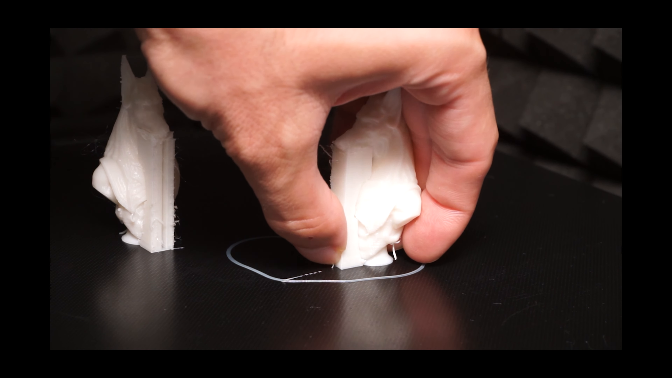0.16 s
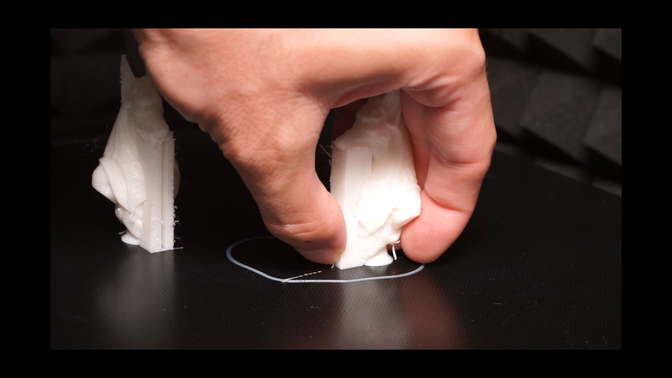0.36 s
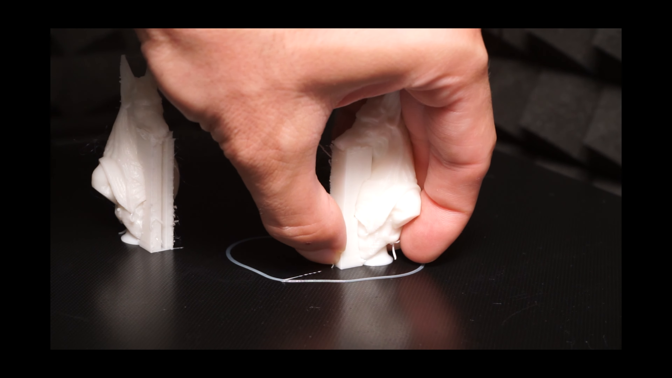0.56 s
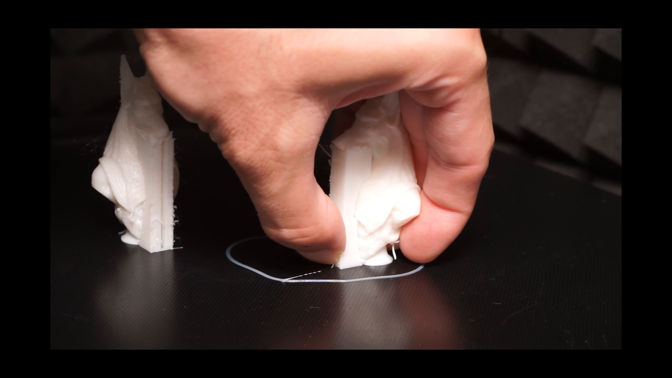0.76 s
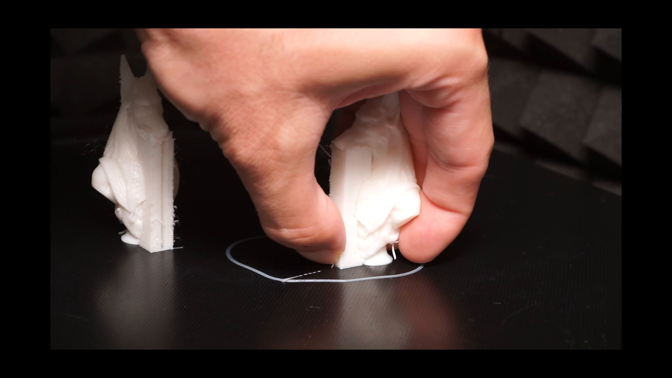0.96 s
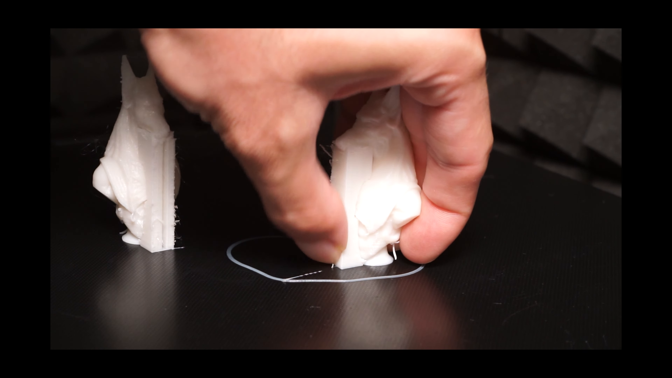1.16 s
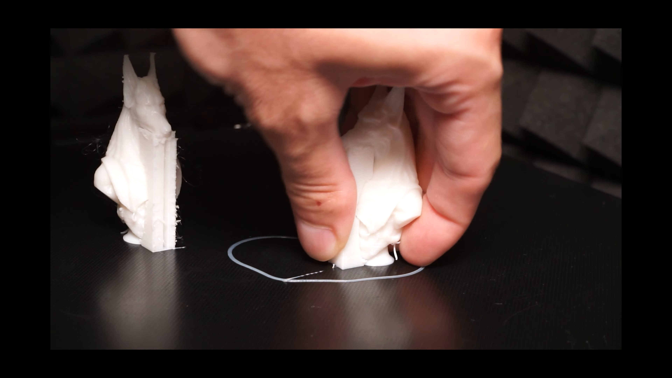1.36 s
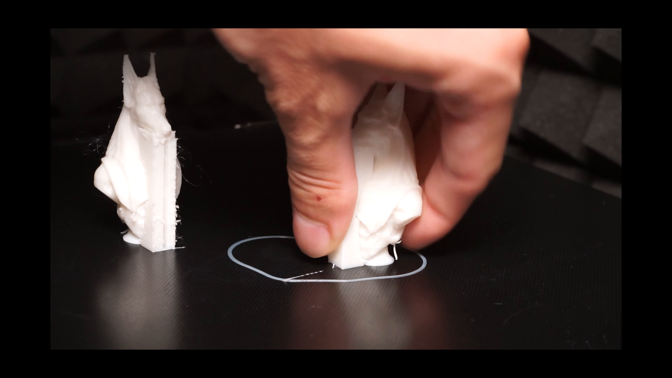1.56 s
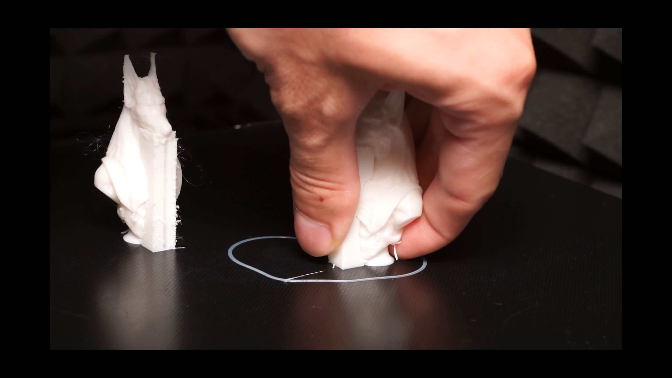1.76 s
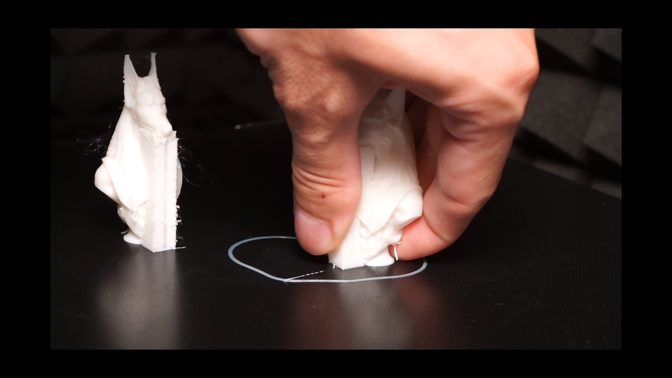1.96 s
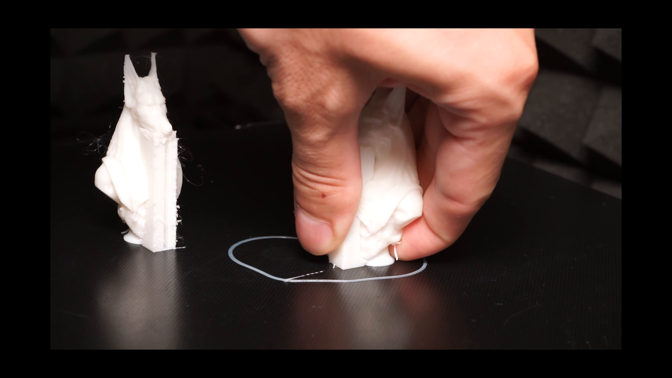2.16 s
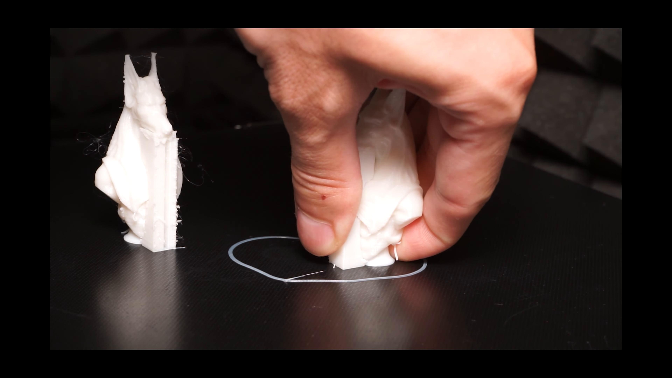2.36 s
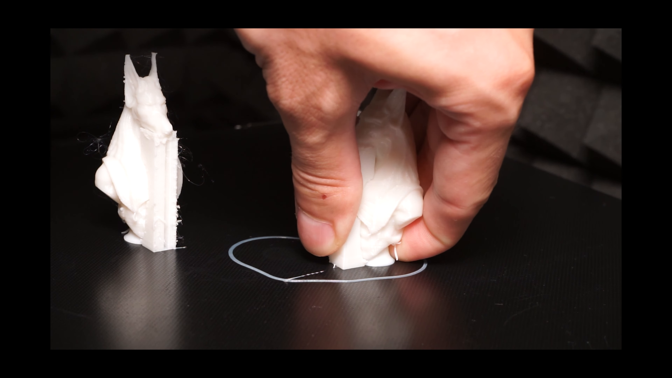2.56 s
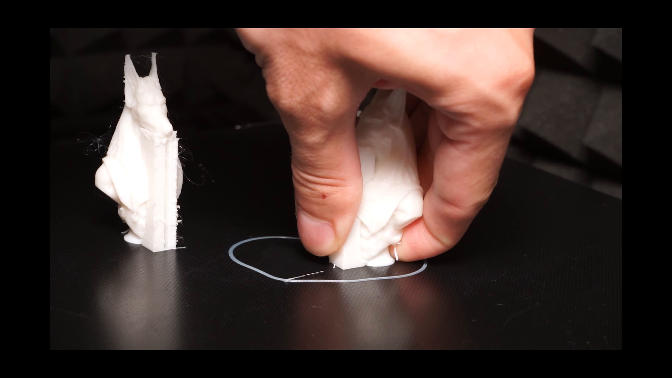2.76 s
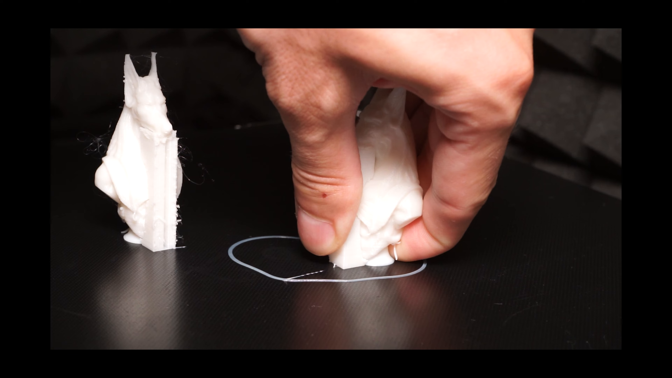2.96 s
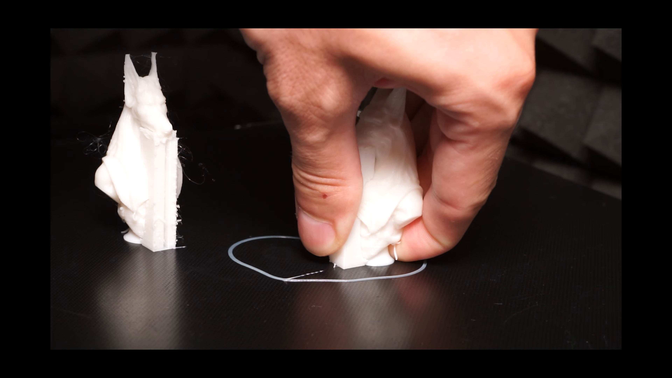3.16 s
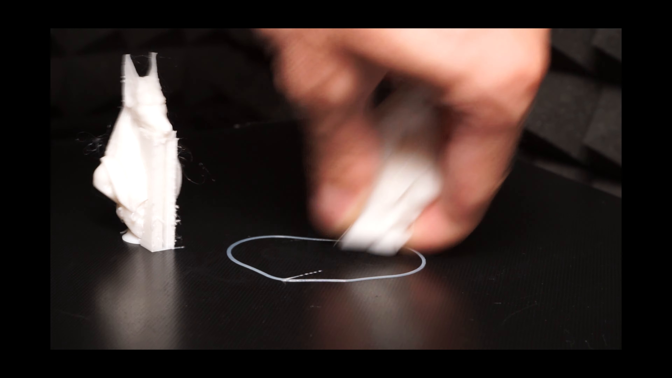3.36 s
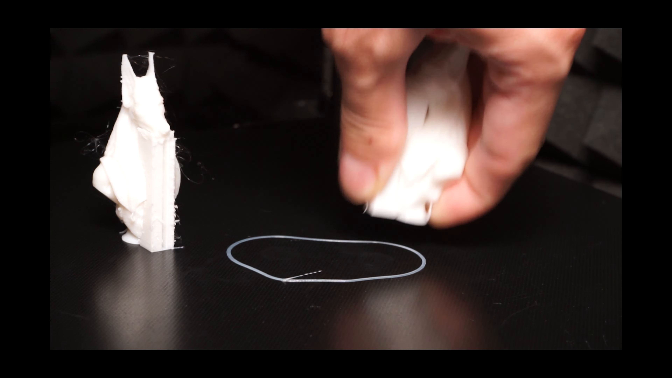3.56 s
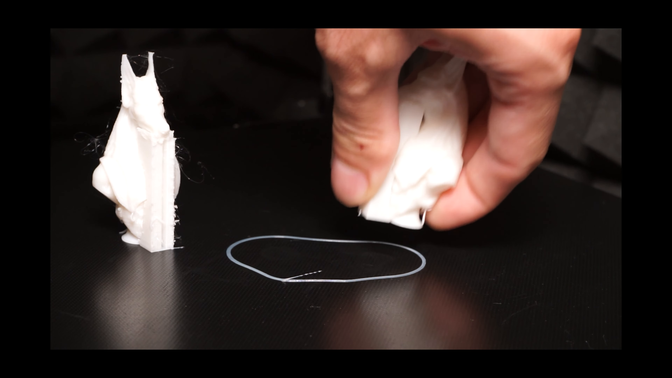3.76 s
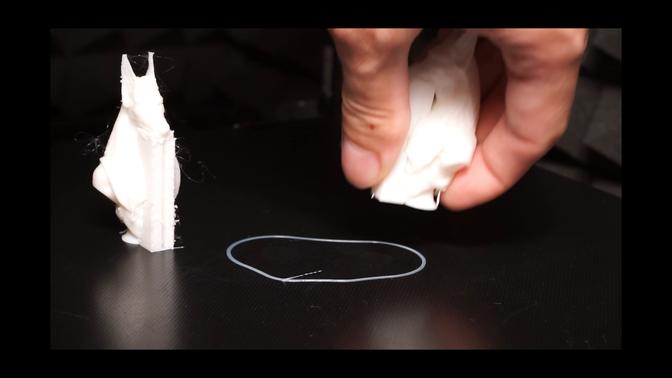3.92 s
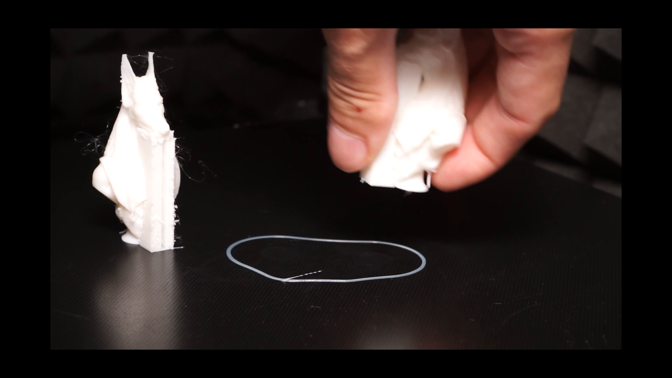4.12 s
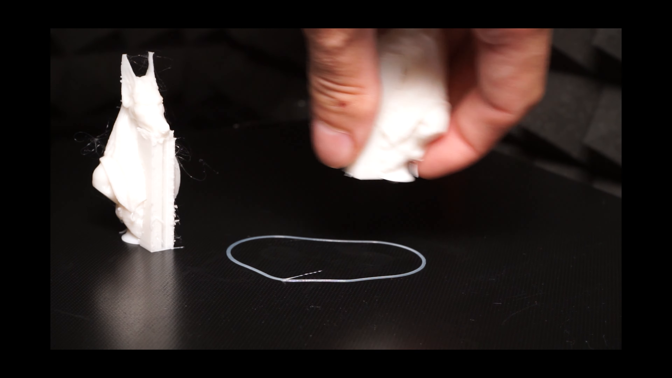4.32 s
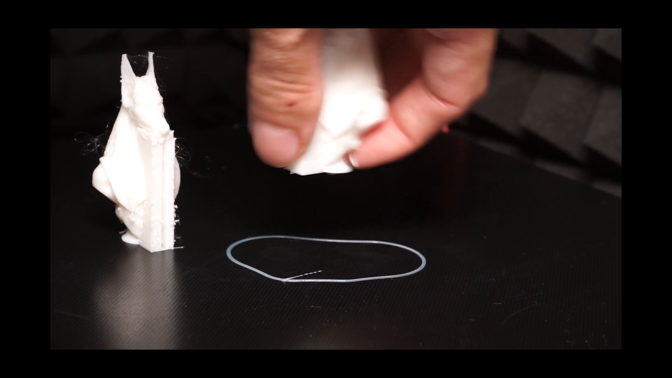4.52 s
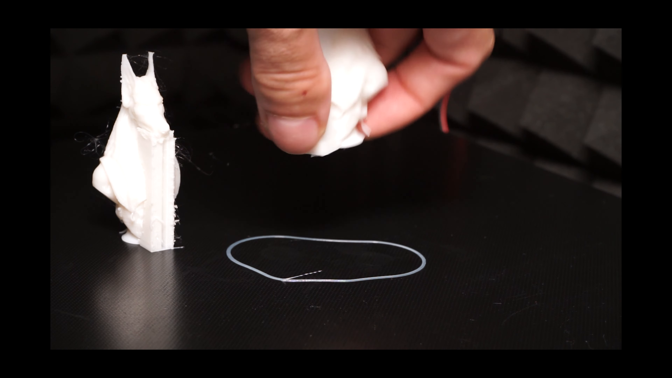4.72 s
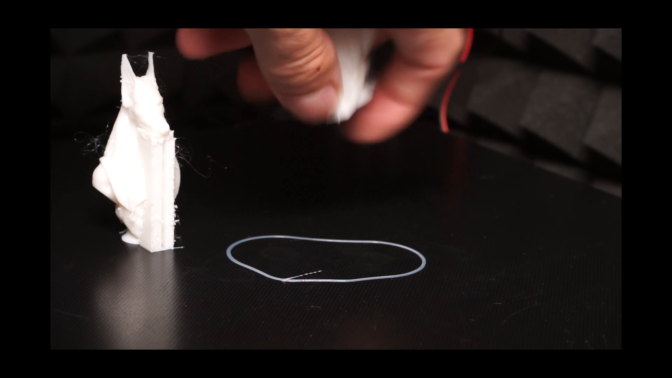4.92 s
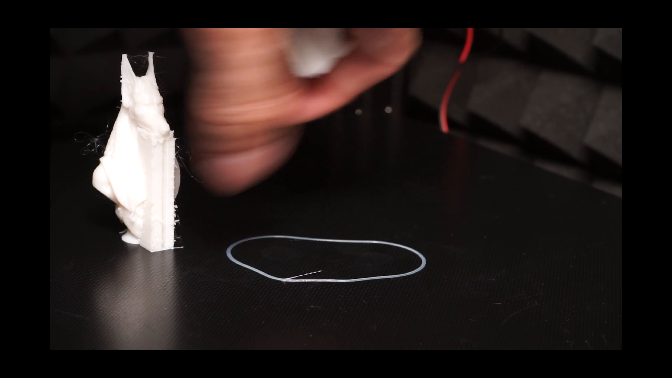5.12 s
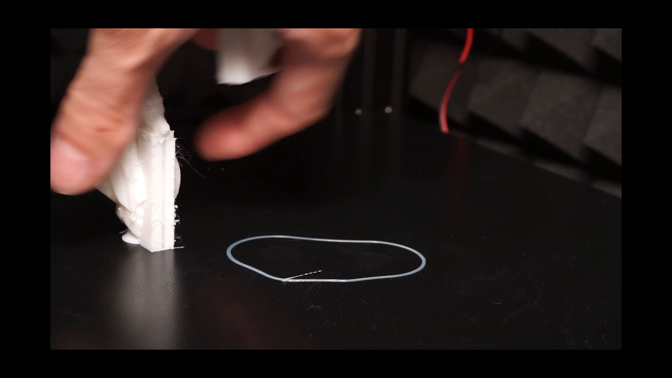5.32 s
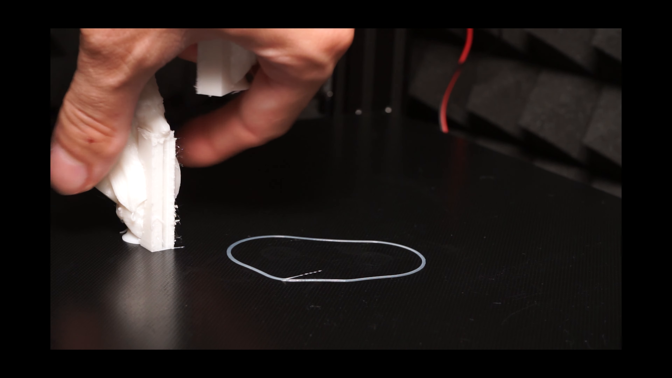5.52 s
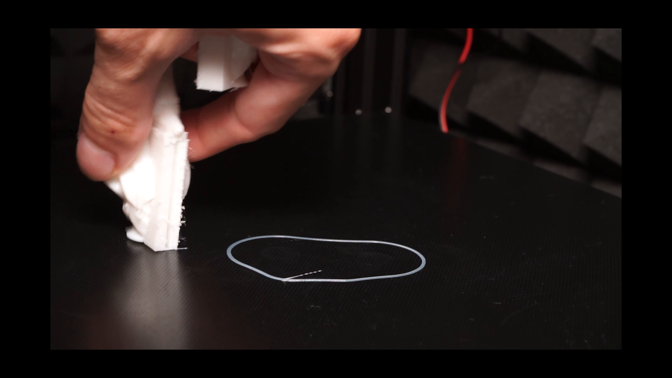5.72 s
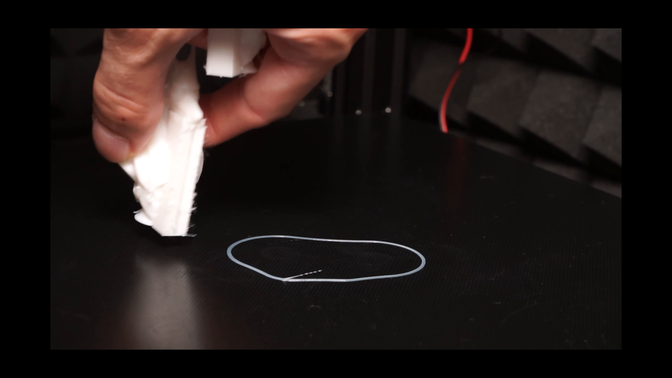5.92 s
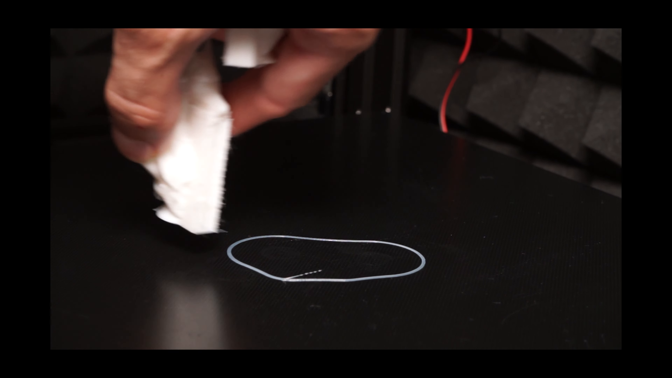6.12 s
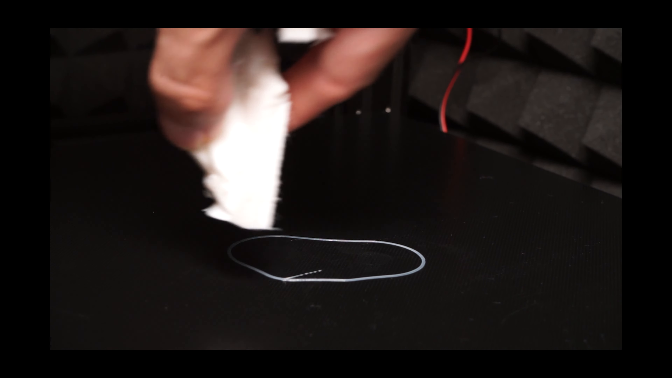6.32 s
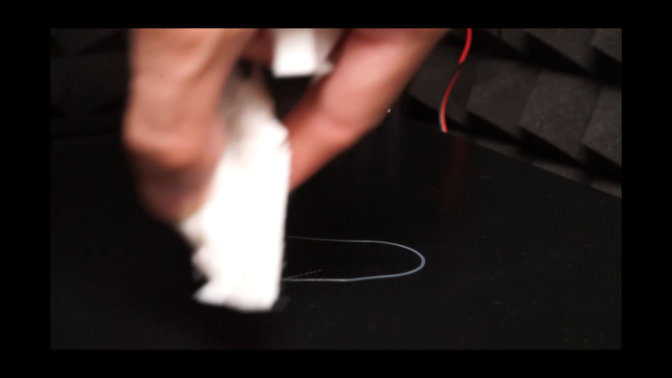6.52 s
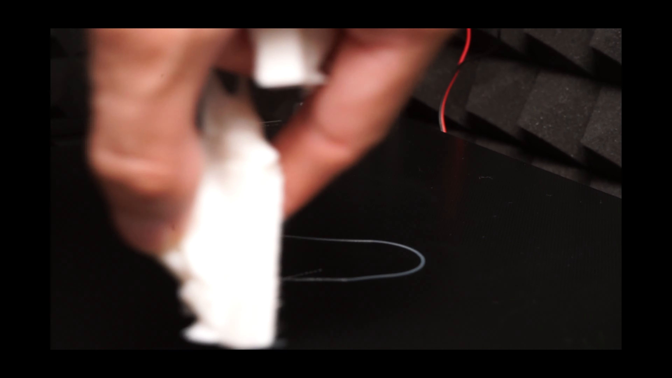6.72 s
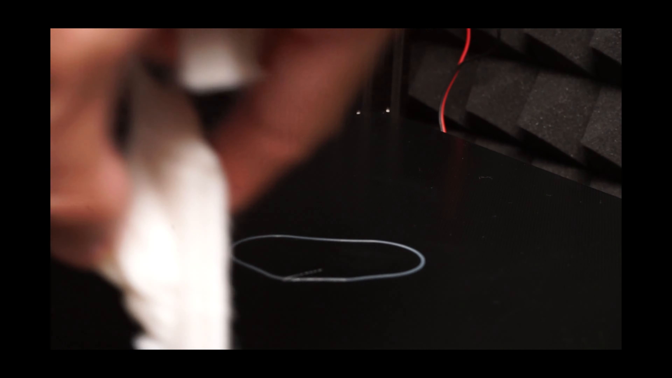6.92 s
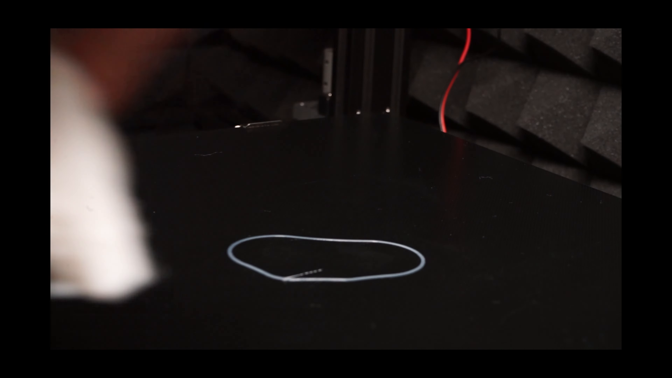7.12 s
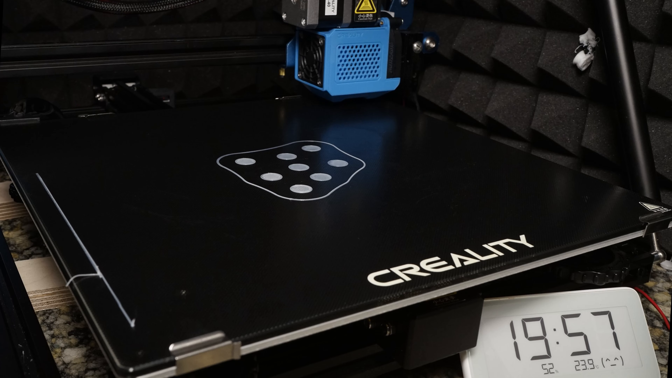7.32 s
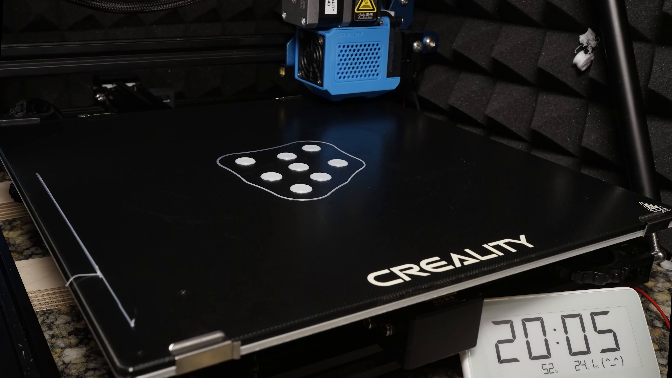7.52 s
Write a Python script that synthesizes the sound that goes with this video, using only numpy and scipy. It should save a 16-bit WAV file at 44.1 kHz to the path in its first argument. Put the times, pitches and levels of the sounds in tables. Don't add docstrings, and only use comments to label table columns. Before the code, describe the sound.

Close, dry handling rumble and dull pops, then sharp plastic cracks tear a printed part off a glass bed, followed by finger rubs and ticks.

```python
import sys
import numpy as np
from scipy import signal
from scipy.fft import rfft, irfft, next_fast_len
from scipy.io import wavfile
from scipy.ndimage import map_coordinates

SR = 44100
rng = np.random.default_rng(int(sys.argv[2]) if len(sys.argv) > 2 else 0)


def magnitude_from_level(level_db):
    exponent = np.asarray(level_db, float) / 20
    return 10 ** exponent


def dump_mix(stems):
    frames = np.atleast_2d(stems).T
    limited = np.clip(frames, -1, 1)
    pcm = np.round(limited * 32767).astype(np.int16)
    wavfile.write(sys.argv[1], SR, pcm)


N = 334454


def unit(x):
    return x / np.sqrt(np.mean(x ** 2) + 1e-20)


def top(x):
    return x / np.abs(x).max()


def along(points, hz):
    f, v = np.transpose(points)
    return np.interp(np.log(hz + 1), np.log(f + 1), v)


def curves(rows):
    s, *cols = np.transpose(rows)
    return [np.interp(np.arange(N) / SR, s, c) for c in cols]


def milliseconds():
    return np.arange(0, N / SR, .001)


def sampled(rows):
    return [np.interp(np.arange(N) / SR, milliseconds(), row) for row in rows]


def moment():
    return np.arange(SR // 14) / SR


def wobble(rate):
    knots = rng.standard_normal(int(N * rate / SR) + 4)
    return map_coordinates(knots, [np.arange(N) * rate / SR])


def filtered(x, response):
    m = 2 * next_fast_len(len(x) // 2 + 2048)
    return irfft(rfft(x, m) * response(np.fft.rfftfreq(m, 1 / SR)), m)[:len(x)]


def causal(points):
    def response(hz):
        c = irfft(np.log(magnitude_from_level(along(points, hz))))
        half = len(c) // 2
        return np.exp(rfft(np.r_[c[0], 2 * c[1:half], c[half]], len(c)))[:len(hz)]
    return response


def ringing(x, modes):
    def response(f):
        return sum((-1) ** k * magnitude_from_level(db) * 1j * f * w / (c * c - f * f + 1j * f * w)
                   for k, (c, w, db) in enumerate(modes))
    return filtered(x, response)


def blurred(modes, spread):
    return [(hz, spread * w, db) for hz, w, db in modes]


def noise(spectrum):
    return unit(filtered(rng.standard_normal(N), lambda hz: magnitude_from_level(along(spectrum, hz))))


def evened(x, share):
    size = np.abs(signal.hilbert(x, next_fast_len(N))[:N])
    return unit(x / (size + .3) ** share)


def burst(t60, rise):
    t = moment()
    return magnitude_from_level(-60 * t / t60) * (1 - np.exp(-t / rise)) * rng.standard_normal(len(t))


def add(track, s, x):
    part = track[round(s * SR):][:len(x)]
    part += x[:len(part)]


# pitch_hz, t60_s
ROOM = [(200, 0.16), (1000, 0.22), (4000, 0.33), (14000, .2)]
# pitch_hz, level_db
ROOM_TILT = [(200, 7), (1500, -3), (6000, -6), (15000, -10.5)]


def room(x, longer):
    hz, t, z = signal.stft(rng.standard_normal(SR // 3), SR, nperseg=256)
    tail_db = along(ROOM_TILT, hz)[:, None] - 60 * t / longer / along(ROOM, hz)[:, None]
    tail = signal.istft(z * magnitude_from_level(tail_db), SR, nperseg=256)[1]
    return signal.fftconvolve(np.pad(x, (200, 0)), tail / np.linalg.norm(tail))


def strike(track, s, direct, colour, room_db, longer=1):
    add(track, s, direct)
    balance = np.linalg.norm(direct) / np.linalg.norm(colour)
    add(track, s, magnitude_from_level(room_db) * balance * room(colour, longer))


# pitch_hz, level_db (per Hz)
HISS = [(180, -43), (300, -13), (549, -6), (705, -8), (1190, -10), (1290, -13), (1800, -14), (5740, -22),
        (15200, -25), (16500, -32)]


def hiss():
    return magnitude_from_level(-77.8 + 0.11 * wobble(0.72)) * noise(HISS)


# start_s, effort_db
EFFORT = [(0, -76), (.5, -80), (.56, -70.5), (.85, -78), (1.22, -74.5), (1.33, -65), (1.8, -69.5),
          (2.12, -71), (2.24, -74.5), (3.05, -71), (3.36, -78.5), (3.48, -59), (3.8, -75.5), (3.95, -66.5),
          (4.85, -77.5), (6.4, -74), (6.7, -73), (7.4, -65.5)]
# peak_s, frame_db, table_db, t60_s
JOLTS = [(0, -51.5, -63, 1.15), (.65, -49, -60, 1.1), (1.2, -56, -80, 0.51), (1.31, -53, -60, .8),
         (1.39, -53.5, -69, 1.3), (1.68, -48.5, -62, 0.32), (1.82, -48.5, -61, 2.3),
         (2.18, -57.5, -54.5, 0.8), (2.5, -58, -69, 2), (2.999, -45.5, -55.5, 1.08),
         (3.138, -46.5, -60.5, 0.96), (3.43, -45.5, -49.5, 0.61), (3.47, -37.5, -52.5, 0.41),
         (3.62, -39, -51.5, 1.03), (3.939, -65, -57.5, 1.03), (4.19, -60.5, -55, 1.78),
         (4.45, -51.5, -59, 1.29), (4.8, -60, -67.5, 1.02), (5.82, -71, -60, 1.4), (6.01, -60.5, -60, 0.59),
         (6.5, -61, -57, 1.04), (6.61, -52.5, -54.5, 0.57), (6.73, -55, -60, 0.69),
         (6.83, -64.5, -58.5, 0.65), (6.96, -52.5, -51, 0.68), (7.1, -50.5, -59.5, 1.9),
         (7.27, -50.5, -53, 3.3)]
# pitch_hz, level_db (per Hz)
SHAKE = [(15, -26.5), (30, -8.5), (47, 1), (65, -6), (90, -31.5), (150, -120)]
RUMBLE = [(40, -120), (65, -5), (90, 2.5), (130, -4), (190, -7), (260, -20.5), (400, -120)]
RUSTLE = [(120, -120), (200, 0), (260, 1.5), (450, -9), (800, -19), (1600, -31), (4000, -48), (8000, -120)]


def handling():
    t, (effort_db,) = milliseconds(), curves(EFFORT)
    rise_db_per_s = 249.5
    jolts = 0
    for s, *dbs, t60 in JOLTS:
        below_peak_db = np.maximum(rise_db_per_s * (s - t), 60 * (t - s) / t60)
        jolts = jolts + (magnitude_from_level(dbs)[:, None] * magnitude_from_level(-below_peak_db)) ** 2
    extra_db = effort_db + 76
    steady = magnitude_from_level([-63 + 0.33 * extra_db, -71 + 0.8 * extra_db])
    shake, rumble = np.sqrt(steady ** 2 + sampled(jolts))
    lumps = wobble(12)
    low = shake * evened(noise(SHAKE), 0.36)
    low += rumble * magnitude_from_level(lumps) * evened(noise(RUMBLE), 0.34)
    return low + magnitude_from_level(effort_db + 1.8 * lumps + 0.93 * wobble(36)) * noise(RUSTLE)


# start_s, level_db, pitch_hz, t60_s
THUMPS = [
    (.55, -41, 58, .3),
    (.604, -43, 54, .4),
    (1.2966, -54, 90, .1),
]


def thumps():
    out, t = np.zeros(N), np.arange(SR // 3) / SR
    for s, db, hz, t60 in THUMPS:
        swing = magnitude_from_level(-60 * t / t60) * np.sin(2 * np.pi * hz * t)
        swing += .3 * magnitude_from_level(-60 * t / .04) * np.sin(2 * np.pi * 260 * t)
        add(out, s, magnitude_from_level(db) * (1 - np.exp(-t / .003)) * swing)
    return out


# start_s, click_db, wood_db, room_db
KNOCKS = [
    (6.938, -32, -32.5, -13),
    (7.135, -37.5, -35.5, -14),
]
# pitch_hz, width_hz, level_db
CLICK = [(1140, 210, 1.5), (1780, 600, 1.5), (3330, 1130, -1.5), (6000, 1800, -4.5), (10500, 4500, -13.5),
         (14500, 2300, -18.5)]
WOOD = [(132, 73, -7.5), (240, 36, 5), (330, 180, -1.5), (502, 36, 6.5), (723, 62, -5), (949, 45, -0.5),
        (1240, 44, -11)]


def knocks():
    out, step = np.zeros(N), moment() == 0
    lag_s, bounce_s, bounce_db = .0045, .011, -9
    for s, click_db, wood_db, room_db in KNOCKS:
        click = top(ringing(burst(0.026, 0.00031), CLICK))
        push = np.roll(step, round(lag_s * SR)) + 0.045 * burst(0.047, 0.0024)
        push += magnitude_from_level(bounce_db) * np.roll(step, round((lag_s + bounce_s) * SR))
        direct = magnitude_from_level(click_db) * click + magnitude_from_level(wood_db) * top(ringing(push, WOOD))
        colour = ringing(step, CLICK) + 2.66 * ringing(step, blurred(WOOD, 1.7))
        strike(out, s, direct, colour, room_db, longer=1.32)
    return out


# pitch_hz, level_db, t60_s, rise_s
SPRINGS = [(38.5, -29.5, .6, 0.054), (49, -28.5, 0.99, 0.031)]
# pitch_hz, level_db, t60_s
PING = [(8200, -55, .06), (11000, -54, .07), (13100, -54, .06)]
# pitch_hz, level_db (per Hz)
RATTLE = [(150, -120), (300, 2), (700, -2.5), (1500, -9), (3000, -16), (6000, -22), (9000, -29.5),
          (16000, -58.5)]
FIZZ = [(1500, -120), (3000, -3.5), (6000, -1.5), (11000, -6), (14000, -11.5), (16000, -19.5)]
BOOM = [(90, -120), (150, -2.5), (250, 0), (450, -2.5), (700, -10.5), (1200, -120)]


def bed():
    release_s = 3.405
    t = np.maximum(np.arange(N) / SR - release_s, 0)
    out = np.zeros(N)
    for hz, db, t60, rise in SPRINGS:
        out += magnitude_from_level(db - 60 * t / t60) * (1 - np.exp(-(t / rise) ** 2)) * np.sin(2 * np.pi * hz * t)
    for hz, db, t60 in PING:
        out += magnitude_from_level(db - 60 * t / t60) * np.sin(2 * np.pi * hz * t)
    buzz = np.zeros(N)
    for db, t60, colour in [(-46, 0.38, RATTLE), (-63, .75, FIZZ), (-46.5, .6, BOOM)]:
        buzz += magnitude_from_level(db - 60 * t / t60) * noise(colour)
    return out + buzz * magnitude_from_level(1.8 * wobble(90)) * (1 - np.exp(-t / 0.0016))


def stroke_levels(rows):
    t, edge_db_per_s = milliseconds(), 3500
    levels = []
    for s, length, *dbs in rows:
        away = np.maximum(np.maximum(s - t, t - s - length), 0)
        levels.append(np.array(dbs)[:, None] - edge_db_per_s * away)
    return sampled(np.max(levels, axis=0))


# start_s, length_s, fine_db, coarse_db, flat_skin_db
STROKES = [(4.058, .028, -73, -90, -82), (4.088, .008, -76, -86, -86), (4.098, .012, -72, -78, -86),
           (4.13, .013, -74, -92, -90), (4.151, .013, -75, -92, -89), (4.18, .003, -75, -95, -86),
           (4.697, .016, -81, -86, -84), (4.945, .04, -88, -90, -86), (4.992, .013, -69, -76, -66),
           (5.012, .018, -79, -88, -86), (5.037, .045, -79, -92, -88), (5.652, .02, -82, -82, -88),
           (5.698, .01, -83, -78, -84), (5.718, .034, -84, -81, -90), (5.966, .018, -88, -79, -84),
           (6.292, .01, -95, -90, -92), (6.31, .03, -95, -90, -88), (7.347, .012, -90, -84, -82)]
# start_s,
# fine_db, coarse_db (relative to fine)
SLIPS = [(3.5145, -73, -8), (3.5385, -72, -20), (3.5565, -66, -15), (3.5855, -65, -8), (3.5935, -72, -4),
         (3.6114, -62, -9), (3.6295, -78, 3), (3.6657, -74, 6), (3.6895, -73, 1), (3.7165, -72, 0),
         (3.726, -79, 3), (4.0404, -59, -20), (4.0568, -59, -13), (4.0615, -60, -8), (4.0828, -61, -12),
         (4.098, -60, -14), (4.1054, -50, -13), (4.1186, -65, -15.5), (4.131, -60.5, -20),
         (4.1495, -59.5, -19), (4.7084, -63.5, -9), (4.9605, -64, -3), (4.9675, -67, -3), (4.996, -56, -8),
         (4.9997, -53, -8), (5.6443, -61.5, -14), (5.6974, -65.5, -1.5), (5.7184, -69, 0), (5.7334, -68, 0),
         (5.9728, -71, -9.5)]
# start_s, length_s, level_db
NAIL = [(4.085, .025, -81), (4.992, 0.011, -80), (5.012, 0.011, -85), (5.652, .026, -85),
        (5.698, 0.056, -84), (5.966, .02, -85), (6.04, .008, -83), (6.058, 0.0041, -88), (6.292, .008, -82)]
# pitch_hz, width_hz, level_db
FINE = [(11000, 500, -3), (12400, 910, -18), (13300, 740, -3.5), (14200, 630, -2.5), (15300, 1300, -5.5)]
COARSE = [(5100, 380, -4.5), (7700, 550, 0), (9050, 600, -1), (11600, 500, -6)]
BROAD = [(6400, 1300, 5), (8000, 1600, 4), (10300, 1800, -2.5), (12200, 1800, -5)]
NAIL_RING = [(5120, 540, 0)]


def rubs():
    fine_db, coarse_db, flat_db = stroke_levels(STROKES)
    (nail_db,) = stroke_levels(NAIL)
    grains = (rng.random(N) < 1500 / SR) * magnitude_from_level(rng.exponential(size=N))
    stroke = 1.3 * rng.standard_normal(N) + unit(grains * rng.standard_normal(N))

    def fine(x):
        return ringing(ringing(x, FINE), [(13500, 15000, 0)])

    def coarse(x):
        return ringing(ringing(x, COARSE), blurred(COARSE, 3))

    flat = ringing(ringing(stroke, BROAD), [(9500, 9000, 0)])
    nail = ringing(ringing(stroke, NAIL_RING), NAIL_RING)
    out = magnitude_from_level(fine_db) * unit(fine(stroke)) + magnitude_from_level(coarse_db) * unit(coarse(stroke))
    out += magnitude_from_level(flat_db) * unit(flat) + magnitude_from_level(nail_db) * unit(nail)
    for s, db, more_db in SLIPS:
        puff = burst(0.0094, 0.00016)
        add(out, s + .0006, magnitude_from_level(db) * top(fine(puff)) + magnitude_from_level(db + more_db) * top(coarse(puff)))
    return out


# pitch_hz, width_hz, level_db
BODY = [(960, 250, -16), (1547.4, 350, -9), (1920, 310, -1.5), (2580, 190, 0.5), (3340, 400, 0),
        (4306, 1400, -5)]
SIZZLE = [(5740, 2300, 0.5), (8400, 2500, -1), (11070, 600, -12), (13900, 1600, -4)]
THUD = [(250, 60, -1.5), (410, 280, -4), (524, 130, 0), (829.6, 250, -12.5), (1170, 250, -8.5)]


def tick(blow, db, thud_db, sizzle_db, thud_hz):
    body = ringing(ringing(blow, BODY), [(2917, 3100, 0)])
    sizzle = ringing(ringing(blow, SIZZLE), [(10000, 9700, 0)])
    press = [(thud_hz, .55 * thud_hz, 0)]
    thud = ringing(ringing(ringing(blow, THUD), press), press)
    return magnitude_from_level(db) * top(body) + magnitude_from_level(sizzle_db + 11.5) * top(sizzle) + magnitude_from_level(thud_db + 9.0) * top(thud)


# start_s, body_db, thud_db, sizzle_db, thud_pitch_hz
SETTLE = [(3.4255, -42, -40, -56, 554), (3.4428, -47, -48.5, -67, 373), (3.4824, -69, -67, -78, 425),
          (3.4998, -66, -62, -80, 250), (3.553, -68, -57, -78, 910), (3.549, -62, -53.5, -70.5, 260),
          (3.5871, -74, -59, -82, 310), (3.6127, -74, -64.5, -80, 539), (3.6418, -72, -66, -84, 1200),
          (3.6657, -71.5, -74, -75, 250), (3.69, -76, -66, -75, 250)]
TICKS = [(0.5101, -68, -83, -71, 250), (1.257, -85, -67, -86, 352), (1.7, -80, -64, -90, 300),
         (5.6645, -74, -56, -80, 410), (5.6725, -74, -58, -78, 299), (5.6965, -72, -64.5, -74, 403),
         (5.717, -71, -64, -81, 510), (5.7323, -74, -66, -73, 330), (6.6245, -62, -70.5, -71, 705.7),
         (6.6615, -70.5, -62, -82, 520), (6.667, -75, -59, -85, 240), (6.6784, -66, -68, -76, 313),
         (6.7442, -63, -71.5, -68, 600), (6.8787, -61.5, -69.5, -73.5, 600), (7.209, -76, -75, -74, 300.2),
         (7.3105, -74, -66, -78, 798), (7.3384, -75, -64, -84, 296), (7.3494, -74, -58.5, -83, 250),
         (7.3785, -60.5, -60, -73, 700)]
CLOSE = [(2.0885, -58, -72, -59.5, 497), (2.0925, -42.5, -65, -52.5, 700), (2.0994, -33.5, -57.5, -44, 900),
         (2.1233, -57, -69.5, -56, 515), (2.4235, -58.5, -78, -61.5, 500), (2.4796, -58, -82, -57, 900),
         (2.4927, -44.5, -73, -45.5, 900), (2.4973, -50.5, -78, -51, 900), (2.5279, -46, -78.5, -50, 903),
         (2.5634, -67, -80, -63.5, 900), (3.3998, -56, -65, -61.5, 600)]


def ticks():
    out, step = np.zeros(N), moment() == 0
    for rows, room_db in [(SETTLE, -19), (TICKS, -14), (CLOSE, -27)]:
        for s, *voice in rows:
            direct = tick(step + .13 * burst(.014, .0004), *voice)
            strike(out, s + 0.0009, direct, direct, room_db)
    return out


# pitch_hz, level_db, t60_s
GLASS = [(539, -33, 0.077), (600, -35.5, 0.059), (730, -41, .05), (970, -32, 0.033), (1133, -34, 0.026),
         (1320, -46, .03), (246, -43, 0.16)]


def glass(t):
    modes = sum(magnitude_from_level(db - 60 * t / t60) * np.sin(2 * np.pi * hz * t) for hz, db, t60 in GLASS)
    return (1 - np.exp(-(t / 0.0081) ** 2)) * modes


# start_s, peak_db
POPS = [(1.255, -58), (1.497, -57), (1.698, -58), (2.7637, -41.5), (2.8444, -37.5), (2.937, -56),
        (3.218, -40.5), (3.5478, -44), (5.667, -65), (6.624, -59.5), (6.66, -61), (6.877, -61)]
# pitch_hz, width_hz, level_db
FLEX = [(305, 310, 4.5), (577, 89, 6.5), (1050, 500, -5), (1920, 2200, -1), (3070, 710, -1.5),
        (4200, 600, -20)]


def pops():
    out, t = np.zeros(N), moment()
    soft = signal.butter(6, 4600, fs=SR, output="sos")
    for s, db in POPS:
        blow = (t == 0) + 0.06 * burst(0.021, 0.00036)
        pop = ringing(ringing(blow, FLEX), [(1200, 4400, 0)])
        inward = -top(signal.sosfilt(soft, pop))
        add(out, s + 0.0028, magnitude_from_level(db - 4.0) * (magnitude_from_level(15) * glass(t) + inward))
    return out


def tear(t, modes, rise, lead_s):
    free = np.maximum(t - lead_s, 0)
    ring = 0
    for k, (hz, w, db) in enumerate(modes):
        rise_s = min(rise * (5000 / hz) ** .6, lead_s)
        build = np.clip(1 + (t - lead_s) / rise_s, 0, 1) ** 2
        wave = np.exp(-np.pi * w * free) * np.sin(2 * np.pi * hz * (t - lead_s))
        ring = ring + (-1) ** k * magnitude_from_level(db) * w * build * wave
    return top(ring)


# start_s, peak_db, scatter_db, room_db, rise_s
CRACKS = [
    (2.1034, -7.5, -16, -40, 0.00045),
    (2.451, -12.5, -16.5, -37, 0.00043),
    (2.5708, -10, -18.5, -33, 0.00033),
    (3.0173, -7.5, -18, -28, 0.00055),
    (3.401, 1, -14.5, -29.5, 0.00019),
]
# second_break_s (after the first), second_db, long_scatter_db, low_ring_db
AFTER = [(0.0015, -15.5, -34, 1), (.0015, -12, -29, -1), (.0015, -13, -29, -1), (0.0013, -9, -31, 0.5),
         (.0013, -13, -33, 0)]
# pitch_hz, width_hz, level_db
RING_A = [(570, 64, -10.5), (930, 170, -10.5), (1200, 90, -8.5), (1460, 180, -14), (1890, 160, -6.5),
          (3184, 540, -3.5), (4340, 480, 0), (5800, 980, -4.5), (8040, 730, 1), (8850, 690, -1.5),
          (11100, 1800, -13.5), (13600, 1200, -3), (254, 60, -18)]
RING_B = [(567, 260, -20), (1090, 320, -14.5), (1920, 220, -7.5), (3160, 610, -3.5), (4400, 550, -2),
          (5200, 320, -0.5), (5900, 580, -0.5), (6658, 400, -8), (8100, 1400, -8), (11300, 600, -16),
          (14250, 1700, -11), (254.2, 70, -19)]
RING_C = [(583.8, 120, -25.5), (1090, 380, -12.5), (1900, 160, -4.5), (2452, 150, 2), (3265, 610, 1.5),
          (4620, 420, 3.5), (5730, 480, 4.5), (6750, 400, 0.5), (7887, 1100, -4.5), (11000, 650, -13),
          (13610, 1800, -9.5), (260, 60, -14)]
RING_D = [(580, 130, -13), (1200, 300, -17), (1880, 250, -11.5), (2630, 300, 2), (3165, 400, 1),
          (4200, 330, -5), (5478, 910, -7), (6500, 400, -5), (7950, 1900, -15.5), (9610, 1300, -18.5),
          (13620, 2400, -21.5), (246, 22, -6)]
RING_E = [(250, 40, -10), (585, 98, -6.5), (930, 130, -9), (1200, 72, -10.5), (1520, 86, -9),
          (2030, 100, -5.5), (2540, 260, -1.5), (3260, 240, 2), (3992, 230, 1), (4810, 500, -4),
          (5800, 340, -5), (6480, 710, -6.5), (8109, 1700, -11), (9198, 750, -8), (11800, 1400, -15),
          (14010, 2500, -23)]


def cracks():
    out, t, lead_s = np.zeros(N), moment(), 0.0011
    rings = [RING_A, RING_B, RING_C, RING_D, RING_E]
    for crack, after, modes in zip(CRACKS, AFTER, rings):
        s, db, scatter_db, room_db, rise = crack
        lag, again_db, long_db, low_db = after
        puff = burst(0.014, 0.00093) + magnitude_from_level(long_db - scatter_db) * burst(.03, 0.0024)
        scatter = top(ringing(puff, blurred(modes, 1.6)))
        second = top(ringing(burst(0.0033, .0002), blurred(modes, 1.5)))
        add(out, s + lag, magnitude_from_level(db + again_db) * second)
        add(out, s + rise - lead_s, magnitude_from_level(db) * tear(t, modes, rise, lead_s))
        behind = magnitude_from_level(db) * (magnitude_from_level(low_db) * glass(t) + magnitude_from_level(scatter_db) * scatter)
        strike(out, s, behind, ringing(t == 0, blurred(modes, 3.4)), room_db)
    return out


def scene():
    return (cracks() + ticks() + pops() + knocks() + rubs() + thumps() + bed() + handling())[None]


def roll_off(x):
    return signal.sosfilt(signal.butter(12, 17020, fs=SR, output="sos"), x)


# pitch_hz, level_db
MICROPHONE = [(10, -3.5), (15000, 5), (15900, -1.5), (16600, -25), (17300, -70.5), (22000, -120)]


def record(dry):
    x = hiss() + dry[0]
    x = filtered(x, causal(MICROPHONE))
    x = x / (1 + np.abs(x / .74) ** 8) ** (1 / 8)
    cut_s, fade_s = 7.381, 0.00039
    x = x * np.clip((cut_s - np.arange(N) / SR) / fade_s, 0, 1)
    return roll_off(x[None])


dry = scene()
out = record(dry)
dump_mix(out)
```